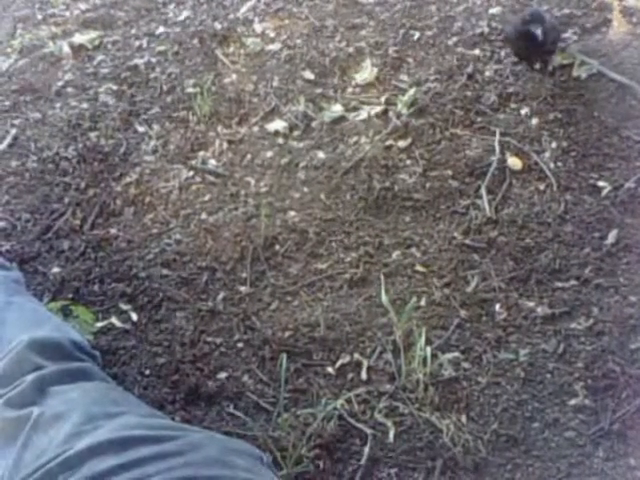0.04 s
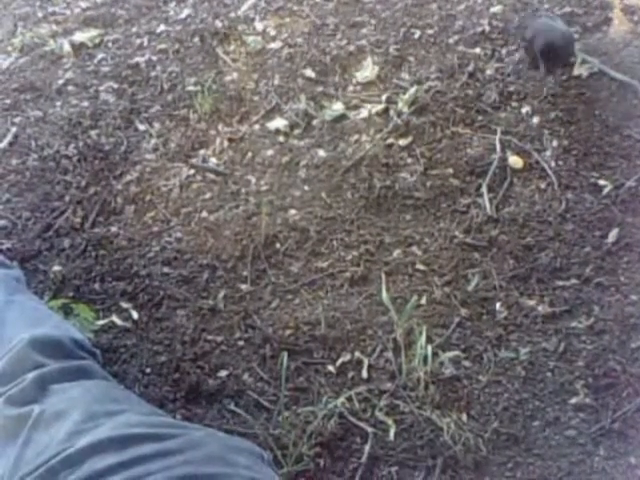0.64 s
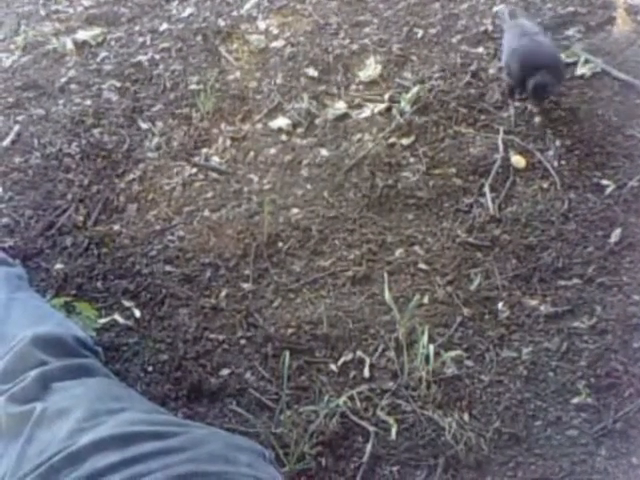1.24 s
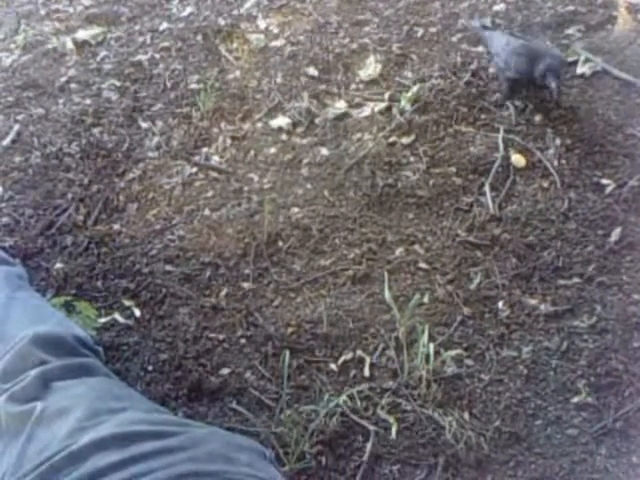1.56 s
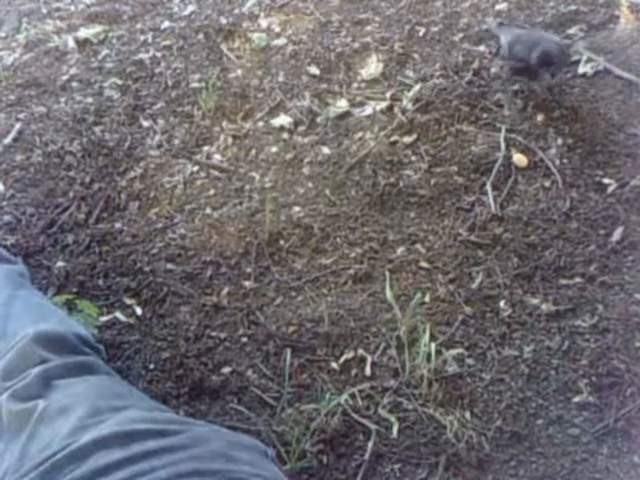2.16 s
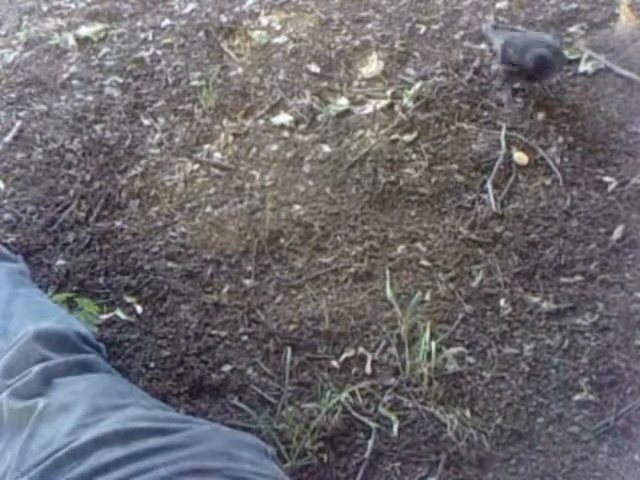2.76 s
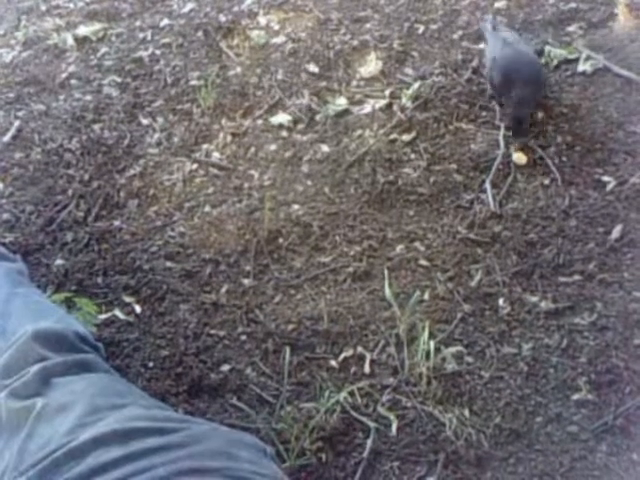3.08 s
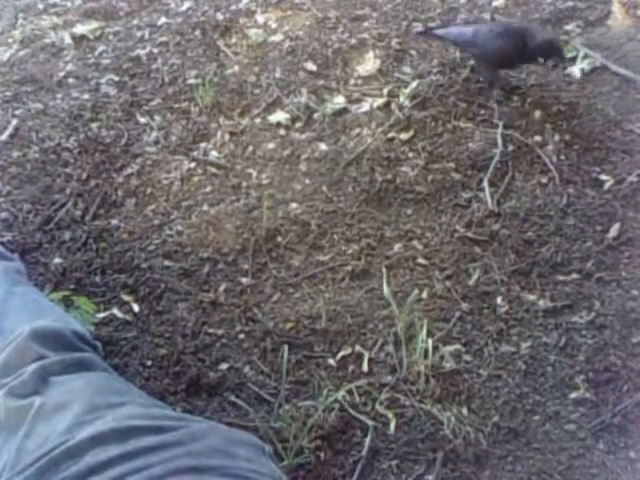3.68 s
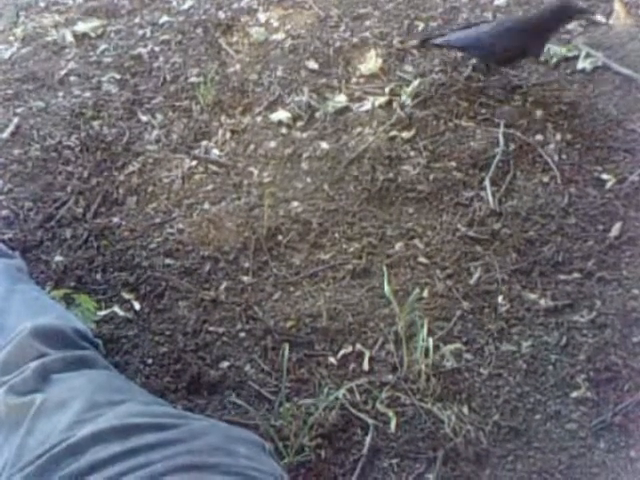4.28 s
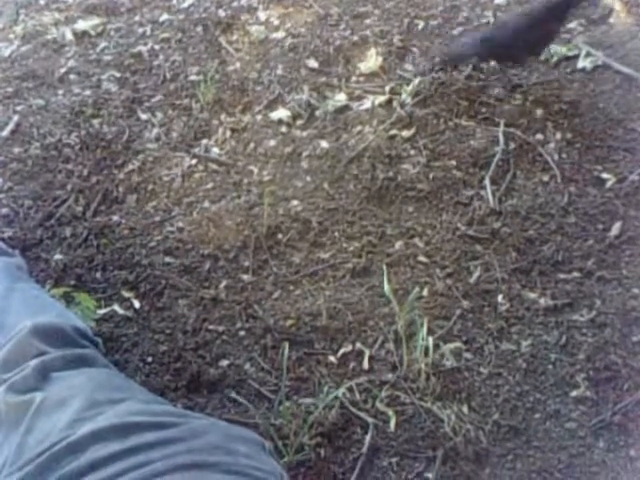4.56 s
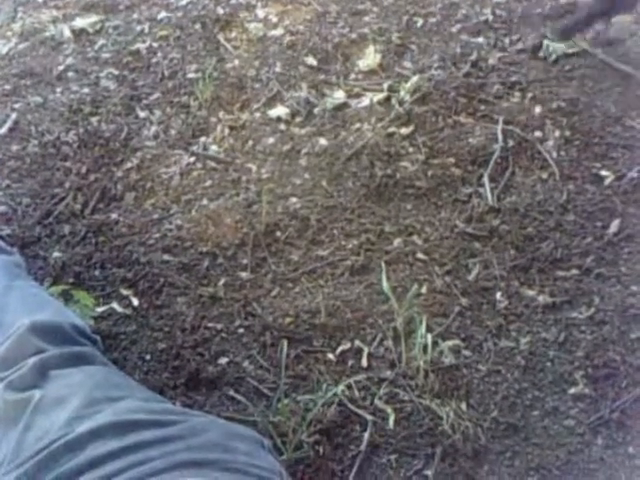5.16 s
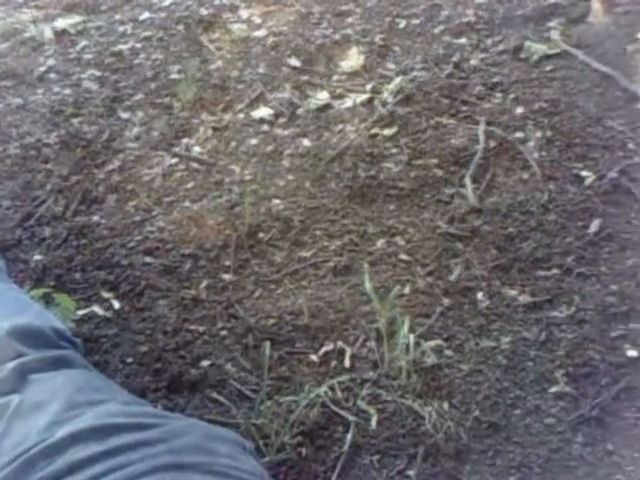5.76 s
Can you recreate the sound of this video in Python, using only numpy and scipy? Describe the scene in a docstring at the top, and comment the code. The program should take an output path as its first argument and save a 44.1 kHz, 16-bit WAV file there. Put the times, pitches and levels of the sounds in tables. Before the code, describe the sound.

Outdoors under trees, a crow a few steps from the microphone walks and pecks in dry leaf litter, making small irregular ticks, snaps and light crackles. Distant small birds give thin, high falling calls, then lower whistles with a soft echo. Far traffic rumbles throughout with faint engine whines. A soft low throb keeps repeating, a low hum comes and goes, and the microphone adds a faint hiss.

```python
"""Under trees, a town in the distance. A few steps away a crow walks and pecks in dry litter:
leaves snap, twigs ring, dragged feet crackle. Small birds whistle, echoed by trunks and crowns.
Far traffic rumbles and engines whine in and out. A low hum comes and goes, and a soft throb keeps
returning, perhaps through the camera body; the camera adds a faint hiss and whine."""
import sys
import numpy as np
from scipy import signal
from scipy.fft import rfft, irfft, next_fast_len
from scipy.io import wavfile
from scipy.ndimage import map_coordinates

SR = 44100
rng = np.random.default_rng(int(sys.argv[2]) if len(sys.argv) > 2 else 0)


def transcribe(signal):
    """Save signal, clipped to [-1, 1], as a 16-bit WAV file at the path in sys.argv[1]."""
    frames = np.atleast_2d(signal).T
    limited = np.clip(frames, -1, 1)
    pcm = np.round(limited * 32767).astype(np.int16)
    wavfile.write(sys.argv[1], SR, pcm)


N = 256662

# beak and claws on litter: t/s, level/dB, relative twig level/dB, twig f/Hz
CONTACTS = [(.1359, -49.5, -20, 5560), (0.2683, -48.5, -24, 5470), (.711, -55, -16, 5500),
            (.7525, -53, -24, 5500), (1.094, -53, -15, 5800), (1.148, -47, -6, 5800),
            (1.159, -52, -9, 5800), (1.2022, -53, -11, 6000), (1.639, -54, -11, 6040),
            (1.6503, -42, -22, 6000), (1.654, -44.5, -14, 6100), (1.6575, -47, -16, 6000),
            (2.036, -49, -13, 5800), (2.1913, -46, -17, 5500), (2.6556, -44, -21, 5500),
            (2.7052, -37.5, -36, 5500), (2.727, -43, -26, 6300), (2.7327, -47, -30, 6300),
            (2.9568, -42.5, -5, 4300), (2.9655, -47, -20, 4600), (3.024, -49, -3, 4600),
            (3.2383, -48, -8, 5600), (3.2463, -46, -12, 5600), (3.2707, -49, -13, 5500),
            (3.279, -53, -10, 5500), (3.3, -42.5, -16, 5500), (3.624, -43.5, -9, 4300),
            (4.001, -48.5, -22, 6300), (4.0758, -57, -22, 6300), (4.4975, -51, -9, 5000),
            (4.5002, -47, -10, 5000), (4.5046, -42, -23, 5000), (4.5155, -50, -12, 5000),
            (4.565, -41, -6, 5000), (4.5681, -44.5, -16, 5150), (4.8862, -39.5, -12, 5300),
            (4.9027, -40, -8, 5100), (4.907, -32.5, -15, 5100), (4.9183, -55, -13, 5300),
            (4.933, -50, -10, 5300), (5.075, -44, -14, 6200), (5.081, -48, -7, 6200),
            (5.156, -49, -5, 4900), (5.166, -49, -9, 4900), (5.3462, -51, -13, 5200),
            (5.5301, -46, -5, 4600), (5.533, -46, -23, 5600), (5.5366, -47, -13, 5600),
            (5.6216, -46.5, -15, 5550), (5.668, -50.5, -11, 5200)]
# bright, dry snap with the microphone's ring near 8.4 kHz: f/Hz, level/dB
SNAP_SPECTRUM = [(2000, -33), (5000, -20.5), (6600, -11), (7500, -7), (8400, 0.5), (9500, -8), (11000, -17),
                 (12000, -40.5)]


def amp(db):
    """Decibels to gain."""
    return 10 ** (np.asarray(db) / 20)


def unit(x):
    """Scale to rms 1."""
    return x / np.sqrt(np.mean(x ** 2) + 1e-20)


def curve(points):
    """One value per sample from (t/s, value) points."""
    return np.interp(np.arange(N) / SR, *np.transpose(points))


def wobble(rate_hz):
    """Smooth random curve, rate_hz knots a second."""
    knots = rng.standard_normal(int(N * rate_hz / SR) + 4)
    return map_coordinates(knots, [np.arange(N) * rate_hz / SR])


def colour(x, points):
    """Minimum-phase filter from (f/Hz, level/dB) points; white noise keeps its power."""
    size = 2 * next_fast_len(N // 2 + 8192)
    hz, db = np.transpose(points)
    bins_hz = np.fft.rfftfreq(size, 1 / SR)
    gain = unit(amp(np.interp(np.log(bins_hz + 1), np.log(hz), db)))
    cepstrum = irfft(np.log(np.maximum(gain, 1e-6)))
    cepstrum[1:size // 2] *= 2
    cepstrum[size // 2 + 1:] = 0
    return irfft(rfft(x, size) * np.exp(rfft(cepstrum)))[:N]


def noise(points):
    """Coloured noise of rms 1."""
    return unit(colour(rng.standard_normal(N), points))


def add(track, start_s, sound):
    """Mix a sound into the track."""
    start = round(start_s * SR)
    part = sound[max(-start, 0):max(N - start, 0)]
    track[max(start, 0):][:len(part)] += part


def swell(track, mid_s, length_s, db):
    """Add a Hann bump to an envelope."""
    add(track, mid_s - length_s / 2, amp(db) * np.hanning(int(length_s * SR)))


def tone(hz, rms_db, drift_rad):
    """Sine with unsteady level and phase."""
    level = np.sqrt(2) * amp(rms_db + 1.6 * wobble(3))
    phase = 2 * np.pi * np.cumsum(hz * np.ones(N)) / SR
    return level * np.sin(phase + drift_rad * wobble(13))


def traffic():
    """Far traffic: a rumble and a wash whose treble swells and sinks on its own."""
    # f/Hz, level/dB
    rumble_spectrum = [(10, 3.5), (25, 1), (36, -3.5), (52, 3.5), (66, 6), (86, -3), (115, -1.5), (155, -3),
                       (185, -13.5), (260, -20), (350, -28), (600, -57.5)]
    wash_spectrum = [(120, -12), (250, 1), (370, -4.5), (500, -3), (650, -5.5), (850, -8), (1150, -6.5),
                     (1900, -17), (2800, -31), (6000, -54)]
    treble_spectrum = [(700, -21.5), (1300, -2.5), (1900, 0), (2800, -4.5), (3400, -8.5), (4200, -8.5),
                       (6000, -26), (9000, -47.5)]
    # t/s, level/dB
    rumble_levels = [(0, -41), (.9, -41.5), (2.8, -44.5), (3.35, -41.5), (3.95, -43), (4.3, -44),
                     (5.2, -45), (5.8, -44)]
    wash_levels = [(0, -59.5), (1.6, -58), (2.5, -60.5), (5.8, -61.5)]
    treble_levels = [(0, -66.5), (.7, -66.5), (1.3, -65), (1.9, -64.5), (2.3, -68.5), (3.5, -68),
                     (4.5, -68.5), (5.8, -71)]
    rumble = amp(curve(rumble_levels) + 1 + 0.96 * wobble(12)) * noise(rumble_spectrum)
    wash = amp(curve(wash_levels) + 0.72 + 0.15 * wobble(2.5)) * noise(wash_spectrum)
    treble = amp(curve(treble_levels)) * noise(treble_spectrum)
    return rumble + wash + treble


def camera(hiss_db=-69):
    """Camera whine and microphone hiss."""
    partials = [(4800, -85), (9600, -96)]  # f/Hz, rms level/dB
    hiss_spectrum = [(3000, 4), (5000, 3.5), (7000, 3.5), (8400, 2.5), (9300, -3), (10500, -7),
                     (11500, -34)]  # f/Hz, level/dB
    whine = sum(tone(hz, db, drift_rad=0.8) for hz, db in partials)
    return whine + amp(hiss_db) * noise(hiss_spectrum)


def hum(start_hz=58.4, rise_hz_per_s=18.03, return_hz=64.9):
    """A low hum climbs in pitch and fades, then returns in short wavering swells."""
    rise_levels = [(0, -34), (.16, -38.5), (.28, -33.5), (.45, -30), (.58, -32), (.65, -24.5), (.7, -42),
                   (.745, -26.5), (.8, -31), (.92, -35.5), (1.1, -63)]  # t/s, level/dB
    returns = [(3.356, 0.49, -34.5), (3.938, 0.16, -32.5), (4.102, 0.074, -33.5)]  # middle t/s, length/s, level/dB
    t = np.arange(N) / SR
    level = amp(curve(rise_levels) + 0.5 * wobble(16.2)) * (t < rise_levels[-1][0])
    rising = level * np.sin(2 * np.pi * np.cumsum(start_hz + rise_hz_per_s * t) / SR)
    swells = np.zeros(N)
    for mid_s, length_s, db in returns:
        swell(swells, mid_s, length_s, db)
    return rising + swells * amp(4 * wobble(33)) * np.sin(2 * np.pi * return_hz * t)


def scuffs(grains_per_s=2200, scatter_db=4.5, idle_db=-78, rustle_lag_s=0.0076):
    """Feet scrape soil; drags and contacts set off tiny crackles in litter that never quite rests."""
    drags = [(0.716, .14, -68.5, -3), (1.09, 0.33, -73, -6), (1.214, 0.29, -81, 13), (1.69, 0.13, -71, -12),
             (2.687, 0.086, -79, -15), (3.507, 0.054, -70.5, -12), (4.322, 0.2, -76, -1),
             (4.558, 0.14, -70, -11), (5.115, 0.3, -77, -6), (5.357, 0.44, -73.5, -15),
             (5.557, 0.088, -70, -5)]  # middle t/s, length/s, level/dB, relative soil level/dB
    soil_spectrum = [(800, -9), (2200, 6), (4200, 6), (7000, -19)]  # f/Hz, level/dB
    leaves, soil = np.full(N, amp(idle_db)), np.zeros(N)
    for mid_s, length_s, db, soil_db in drags:
        swell(leaves, mid_s, length_s, db)
        swell(soil, mid_s, length_s, db + soil_db)
    for at_s, db, twig_db, _ in CONTACTS:
        rustle_db = -43.5 + 0.71 * (db + twig_db)  # heavier blow, more rustle
        swell(leaves, at_s + rustle_lag_s, length_s=0.11, db=rustle_db)
    onsets = rng.random(N) < grains_per_s / SR
    grains = unit(onsets * rng.standard_normal(N) * amp(scatter_db * rng.standard_normal(N)))
    return amp(-0.9) * colour(leaves * grains, SNAP_SPECTRUM) + soil * noise(soil_spectrum)


def pecks(tear_t60_s=0.0052, bend_s=0.01, crumb_t60_s=0.071, twig_q=2.8, strays_per_s=2.4):
    """Each contact snaps a leaf or twig: a click, briefly tearing fibres, a few crumbs around it."""
    body_spectrum = [(800, -24), (2500, -8), (4200, 7.5), (6000, 4), (8000, -5)]  # twig and soil beneath: f/Hz, level/dB
    snaps, bodies = np.zeros(N), np.zeros(N)
    t = np.arange(-SR // 50, SR // 10) / SR
    before, after = np.minimum(t, 0), np.maximum(t, 0)
    draws = rng.random((int(strays_per_s * N / SR), 2))
    strays = [(when * N / SR, -48.5 - 12 * softness, -15, 5200) for when, softness in draws]
    for at_s, db, twig_db, twig_hz in CONTACTS + strays:
        tear = rng.standard_normal(len(t)) * after * amp(-60 * after / tear_t60_s)
        crumbs = unit(rng.standard_normal(len(t)) ** 3)
        crumbs *= np.exp(before / bend_s) * amp(-32 - 60 * after / crumb_t60_s)
        crack = (t == 0) + amp(-3) * tear / np.linalg.norm(tear) + crumbs
        ring = signal.lfilter(*signal.iirpeak(twig_hz, twig_q, SR), crack)
        add(snaps, at_s + t[0], amp(db + 7) * crack)
        add(bodies, at_s + t[0], amp(db + twig_db + 11.5) * ring)
    return colour(snaps, SNAP_SPECTRUM) + colour(bodies, body_spectrum)


def throbs(length_s=0.0803, hz=59.7, level_db=-30, harmonics_db=(0, -15, -24)):
    """A low vibration swells for a few cycles at a time; its even pace shifts now and then."""
    paces = [(.349, .39), (.739, .42), (3.239, .395), (4.432, .423)]  # from t/s, period/s
    out = np.zeros(N)
    t = np.arange(int(length_s * SR)) / SR
    envelope = amp(level_db) * np.sqrt(np.hanning(len(t)))
    ends_s = [start_s for start_s, _ in paces[1:]] + [N / SR + paces[-1][1] / 2]
    for (start_s, period_s), end_s in zip(paces, ends_s):
        for mid_s in np.arange(start_s, end_s - period_s / 2, period_s):
            wave = sum(amp(db) * np.sin(2 * np.pi * (k * hz * t + rng.random()))
                       for k, db in enumerate(harmonics_db, 1))
            add(out, mid_s - length_s / 2, envelope * wave)
    return out


def engines():
    """Each far engine's note swells and fades as its speed drifts."""
    notes = [(1.446, 1.1, 550, 0.5, -68), (2.246, 1.25, 558, -2.5, -70.5), (3.446, 0.92, 557, 1.5, -73.5),
             (1.19, 1.6, 474.6, 2, -69.5), (1.398, 1.8, 440.5, 13.5, -72.5), (4.252, 0.61, 535, -4, -71.5),
             (4.95, 1.6, 625, 0.5, -75)]  # middle t/s, length/s, f/Hz, climb/(Hz/s), level/dB
    out, t = np.zeros(N), np.arange(N) / SR
    for mid_s, length_s, hz, climb_hz_per_s, db in notes:
        envelope = np.cos(np.pi * np.clip((t - mid_s) / length_s, -0.5, 0.5))
        out += envelope * tone(hz + climb_hz_per_s * (t - mid_s), db, drift_rad=0.59)
    return out


def whistle(length_s, start_hz, end_hz, bend, quaver):
    """One sliding note; bend > 1 levels it out, quaver is relative pitch jitter."""
    progress = np.linspace(0, 1, int(length_s * SR))
    jitter = map_coordinates(rng.standard_normal(128), [progress * length_s * 400], mode="mirror")
    glide_hz = end_hz + (start_hz - end_hz) * (1 - progress) ** bend
    phase = 2 * np.pi * np.cumsum(glide_hz * (1 + quaver * jitter)) / SR
    return np.sqrt(np.abs(np.sin(np.pi * progress))) * np.sin(phase)


def phrase(notes, bend, quaver):
    """A track with one whistle per row."""
    song = np.zeros(N)
    for start_s, length_s, start_hz, end_hz, db in notes:
        add(song, start_s, amp(db) * whistle(length_s, start_hz, end_hz, bend, quaver))
    return song


def high_bird():
    """A small bird's thin, clean, falling calls."""
    calls = [(0.654, 0.075, 8450, 7920, -64), (1.155, .08, 8530, 7900, -64),
             (1.234, 0.085, 7900, 7300, -61), (1.442, .06, 8550, 8100, -66),
             (1.498, 0.052, 8000, 7330, -60), (2.9, 0.055, 7800, 6850, -62.5),
             (2.935, 0.076, 7200, 6250, -64), (3.076, .05, 6900, 6500, -67),
             (3.105, .055, 6530, 5750, -66.5), (3.535, .09, 6250, 5700, -69),
             (3.765, 0.04, 6130, 5250, -68), (3.985, 0.095, 8400, 7400, -65.5)]  # t/s, length/s, start f/Hz, end f/Hz, level/dB
    return phrase(calls, bend=1.15, quaver=0.013)


def twitter(step_s=0.033, note_s=0.034, fall=0.0884, scatter=0.04):
    """Faint runs of quick, blurred bird notes that drift in pitch."""
    runs = [(1.68, 1.925, 8130, 6730, -70), (1.971, 2.217, 5460, 5200, -73),
            (3.163, 3.522, 6350, 5350, -75), (3.68, 3.958, 5840, 6510, -71.5)]  # start t/s, end t/s, first f/Hz, last f/Hz, level/dB
    song = np.zeros(N)
    for start_s, end_s, first_hz, last_hz, db in runs:
        for at_s in np.arange(start_s, end_s, step_s):
            hz = np.interp(at_s, [start_s, end_s], [first_hz, last_hz])
            hz *= 1 + scatter * rng.standard_normal()
            add(song, at_s, amp(db) * whistle(note_s, hz, hz * (1 - fall), bend=0.98, quaver=0.029))
    return song


def low_bird():
    """A lower singer: one upward sweep, then husky falling slurs mixed with near-level whistles."""
    # t/s, length/s, start f/Hz, end f/Hz, level/dB
    sweep = (3, 0.27, 2451, 3801, -67.5)
    slurs = [(4.049, 0.042, 3350, 2880, -65.5), (4.437, 0.048, 3980, 3750, -63),
             (4.579, 0.026, 6200, 5620, -64), (4.606, 0.0745, 3930, 3730, -62.5),
             (4.714, 0.042, 3350, 3150, -67), (4.966, 0.0584, 4120, 3690, -59.5),
             (5.372, .08, 5720, 5600, -68), (5.415, 0.073, 3200, 2600, -68),
             (5.557, 0.062, 3800, 3520, -65.5)]
    held = [(3.591, .045, 3730, 3770, -65), (4.222, 0.099, 3270, 3280, -66.5),
            (4.39, 0.071, 3310, 3290, -70), (4.804, .12, 2724, 2750, -64), (4.948, 0.089, 2745, 2725, -73),
            (5.119, .12, 3227, 3224, -64), (5.221, 0.11, 3310, 3380, -67), (5.331, 0.08, 3365, 3320, -69.5),
            (5.681, 0.07, 2640, 2583, -65.5), (5.754, 0.065, 2680, 2510, -65)]
    return (phrase([sweep], bend=1, quaver=0.02)
            + phrase(slurs, bend=1.365, quaver=0.026)
            + phrase(held, bend=1, quaver=0.0094))


def trees(x, t60_s, direct_db, echo_db, build_s=0.0099, near_t60_s=0.14, near_db=-2):
    """Trunks and crowns scatter a song into a soft tail; the bird's own tree answers first."""
    t = np.arange(SR) / SR
    decay = amp(-60 * t / t60_s) + amp(near_db - 60 * t / near_t60_s)
    envelope = decay * (1 - np.exp(-t / build_s))
    fade = np.sqrt(np.hanning(SR // 8))
    echo = np.zeros(N)
    for start in range(0, N, SR // 16):  # a fresh tail for each overlapping slice
        tail = rng.standard_normal(SR) * envelope
        tail /= np.linalg.norm(tail)
        part = x[start:start + len(fade)]
        if part.any():
            add(echo, start / SR, signal.fftconvolve(part * fade[:len(part)], tail))
    return amp(direct_db) * x + amp(echo_db) * echo


def songbirds(flutter_db=2):
    """Three far voices, fluttering in level, each with its own echo."""
    flutter = amp(flutter_db * wobble(60))
    return (trees(flutter * high_bird(), t60_s=0.94, direct_db=-4, echo_db=-3.5)
            + trees(flutter * twitter(), t60_s=0.55, direct_db=-4, echo_db=-3)
            + trees(flutter * low_bird(), t60_s=1, direct_db=-2.5, echo_db=-1.5))


def scene():
    """Mono mix: near crow, far birds and town, throb, hum and camera noise."""
    crow = pecks() + scuffs()
    return (crow + songbirds() + engines() + throbs() + hum() + traffic() + camera())[None]


def record(dry, cutoff_hz=11350):
    """The camera's steep band limit."""
    size = next_fast_len(N + SR // 2)
    hz = np.fft.rfftfreq(size, 1 / SR)
    return irfft(rfft(dry, size) / np.sqrt(1 + (hz / cutoff_hz) ** 120), size)[:, :N]


dry = scene()
out = record(dry)
transcribe(out)
```